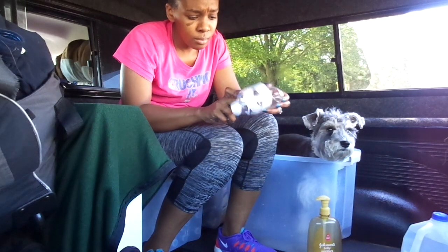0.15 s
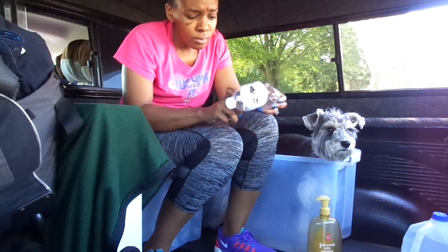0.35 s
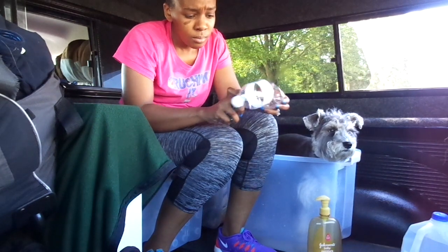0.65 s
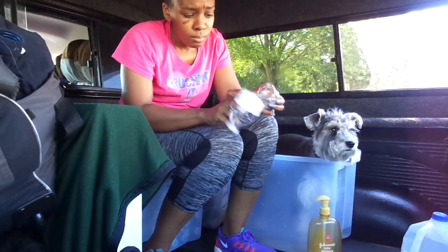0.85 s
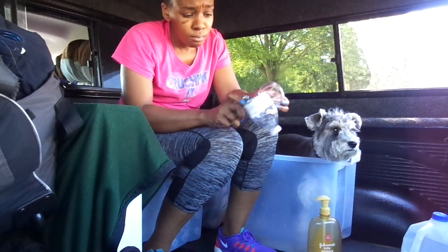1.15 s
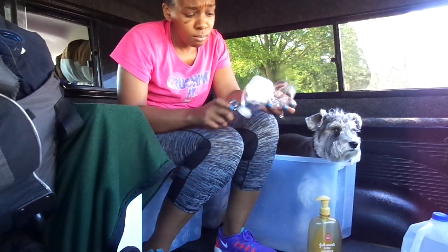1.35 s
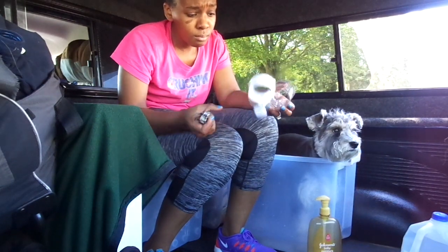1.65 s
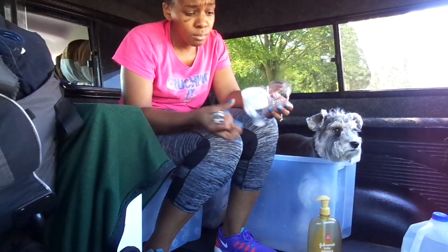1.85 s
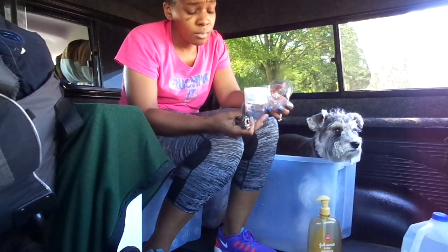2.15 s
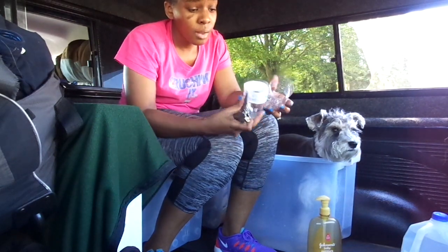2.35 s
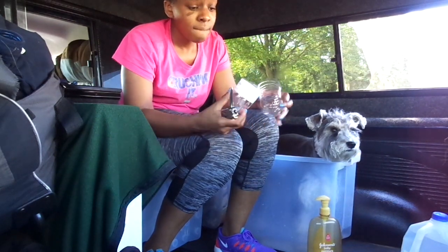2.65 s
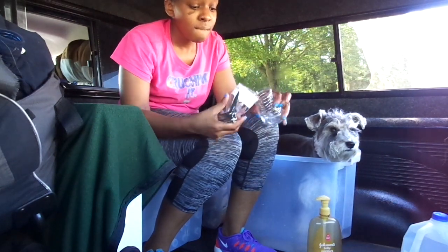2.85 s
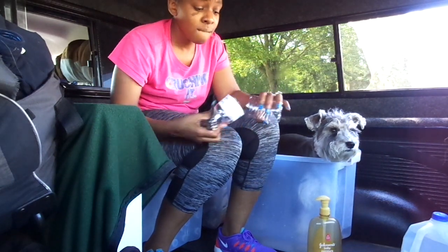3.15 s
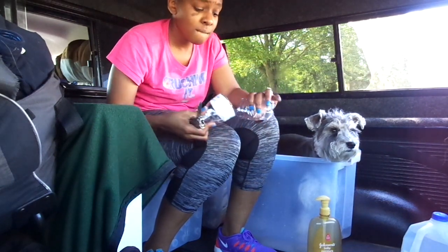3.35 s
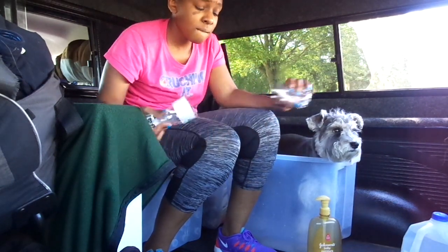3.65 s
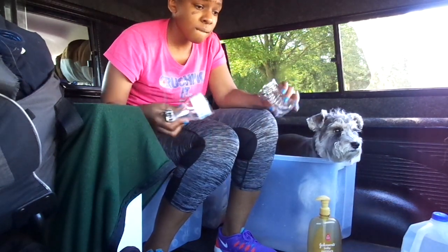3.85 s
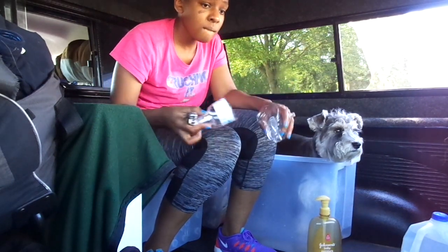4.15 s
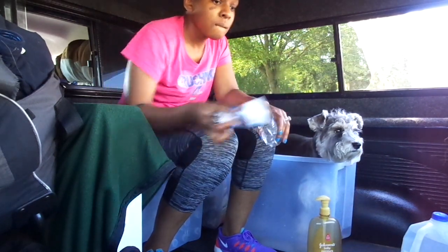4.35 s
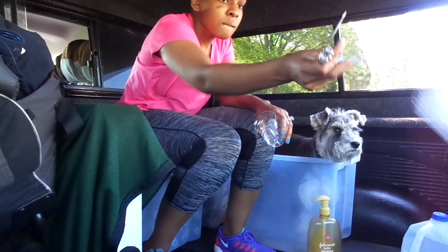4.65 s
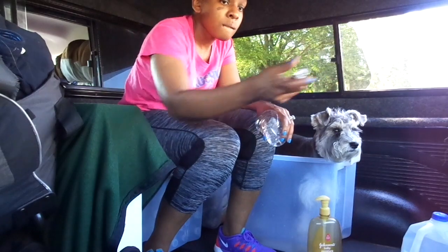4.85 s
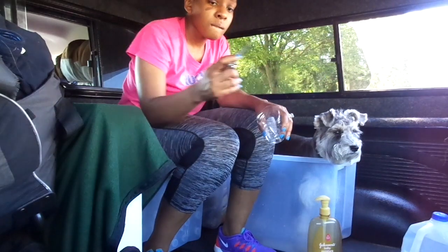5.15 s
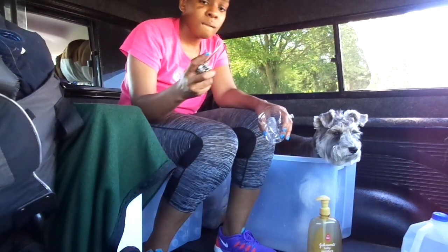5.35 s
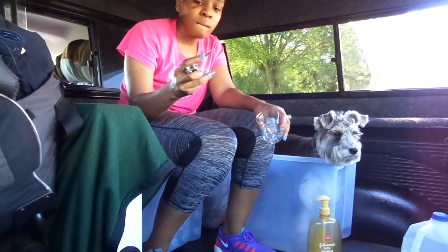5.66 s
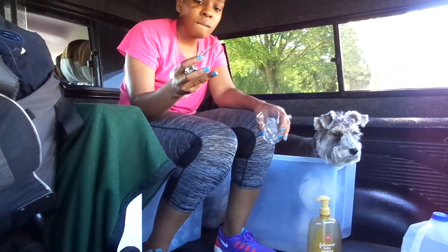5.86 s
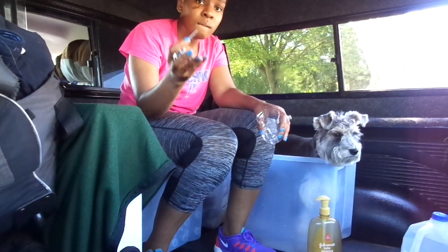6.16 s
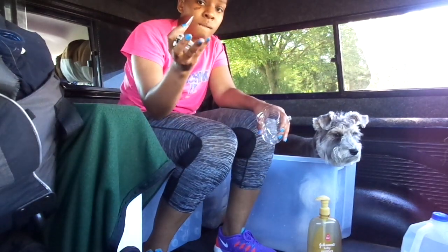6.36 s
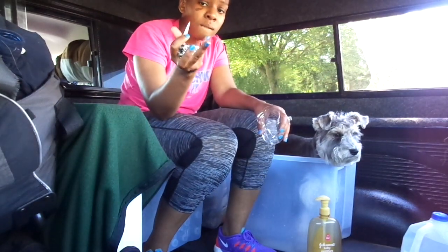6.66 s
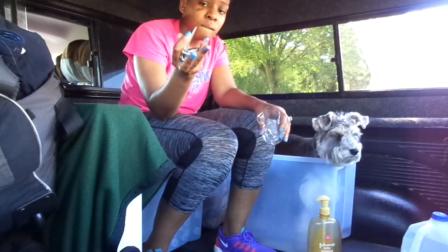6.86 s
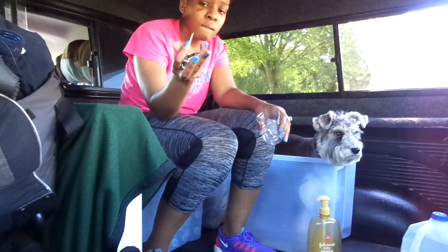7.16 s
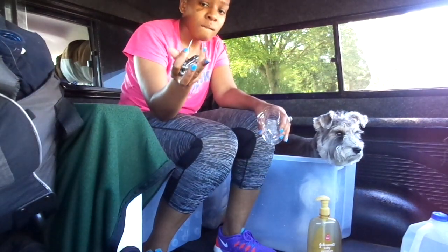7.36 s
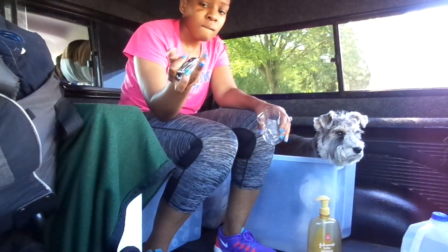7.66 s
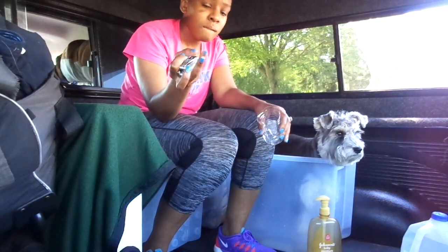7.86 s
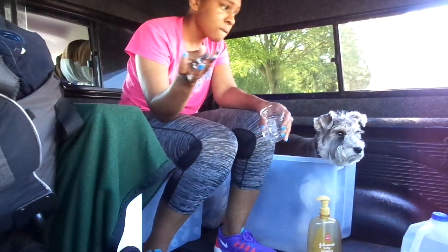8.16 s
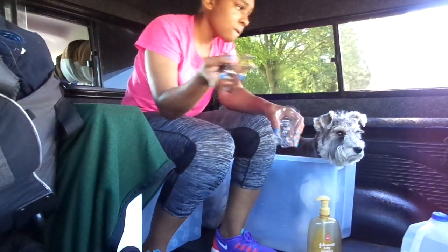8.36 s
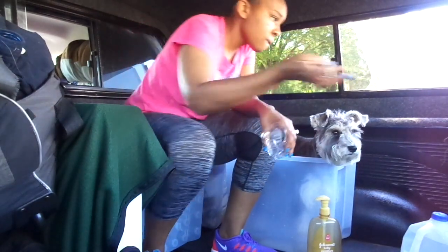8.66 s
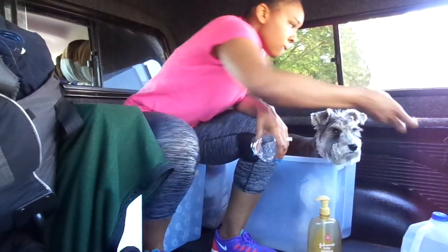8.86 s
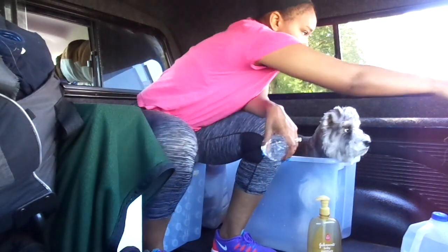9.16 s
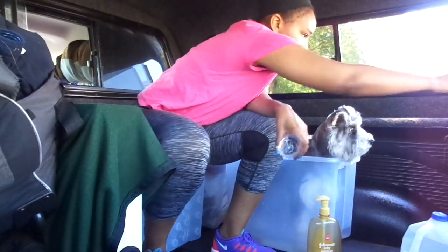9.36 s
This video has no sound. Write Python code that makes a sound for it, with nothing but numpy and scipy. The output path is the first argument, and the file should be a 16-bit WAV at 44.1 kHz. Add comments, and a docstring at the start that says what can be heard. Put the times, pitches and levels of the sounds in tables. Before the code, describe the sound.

A knife saws through a thin plastic bottle in a small padded vehicle, sharp crackling snaps, then a tossed piece bounces with hollow knocks.

```python
"""Inside a small padded van cabin a knife saws through a thin plastic bottle, a metre from a microphone.
Its strokes are dense random slips of plastic; the thin wall then snaps sharply, each snap a short run of
slips that rings a dimple and the cabin. A tossed piece lands and bounces in duller knocks, low decaying
tones sound with some loud blows and when a hand thumps a panel, and hands and cloth rub softly.
Traffic and hiss, made of shaped noise, hum under it all. The loudest blows overload the microphone."""
import sys
import numpy as np
from scipy import signal
from scipy.fft import rfft, irfft
from scipy.io import wavfile
from scipy.ndimage import uniform_filter1d

SR = 44100
rng = np.random.default_rng(int(sys.argv[2]) if len(sys.argv) > 2 else 0)


def to_wav(s):
    """Save 16-bit WAV."""
    ch = np.atleast_2d(s).T  # columns
    pcm = np.round(np.clip(ch, -1, 1) * 32767)  # PCM
    wavfile.write(sys.argv[1], SR, pcm.astype(np.int16))


N = 418950  # length in samples
SIZE = 16384  # samples in one filter or one blow

# fixed resonances of the cabin and microphone: [f/Hz, width/Hz, boost/dB]
RESONANCES = [(545, 76, 7.5), (684.7, 33, 13.5), (803, 36.5, 12.5), (943, 12, -19), (1001, 47, 11),
              (1106, 22, 5.5), (1327, 37, 2.5), (1581, 26, 6.5), (1860, 13, 1.5), (2150, 11.1, 4.5),
              (2320, 14, 1.5), (2660, 85, 1.5), (4380, 78, 5.5), (5400, 100, -5)]


def gain_of(db):
    """Turn decibels into a plain multiplier."""
    return 10 ** (np.asarray(db) / 20)


def evened(x):
    """Scale a signal to an average (rms) level of 1."""
    return x / np.sqrt(np.mean(x ** 2) + 1e-20)


def read(points, hz):
    """Read a curve of (frequency, value) points, joined by straight lines over log frequency."""
    f, value = np.transpose(points)
    return np.interp(np.log(hz + 1), np.log(f + 1), value)


def causal(db):
    """Spectrum with this gain whose ringing all follows the blow (minimum phase)."""
    cepstrum = irfft(np.maximum(db, -100) * np.log(10) / 20)
    # fold the half that lies before time zero onto the half after it
    cepstrum[1:SIZE // 2] *= 2
    cepstrum[SIZE // 2 + 1:] = 0
    return np.exp(rfft(cepstrum))


def peaks_db(modes, hz):
    """Gain in dB of resonances standing on a flat base."""
    return sum(db / (1 + (2 * (hz - f) / width) ** 2) for f, width, db in modes)


def snapping():
    """Sharp snaps of the thin wall as it buckles, and near 6.72 s probably the knife closing or opening."""
    # snaps: [t/s, nominal peak level/dB, dimple f/Hz, slipping time/s, mid level/dB, treble level/dB]
    # the mid and treble levels are against the peak
    snap_rows = [(.105, -22, 673, 0.0029, -1, -7), (.139, -13, 805, 0.0034, 2, -2),
                 (.262, -23.5, 646, 0.0051, 4, 1), (.413, -19, 651, .003, -4, -26),
                 (.712, -5, 864, 0.0031, -4, -12.5), (.736, -6, 2250, 0.0054, -9.5, -7),
                 (.791, -16, 810, 0.0028, -10, -10), (.869, -9.5, 990, 0.0032, -36, -15),
                 (.894, -17, 1090, .0033, 1, -6), (.949, -16.5, 980, 0.0039, -14, -11),
                 (.981, -16.5, 930, 0.0033, -24, -18), (1.033, -8.5, 930, 0.01, -12, -2.5),
                 (1.085, -8, 520, 0.0029, -27.5, -16), (1.095, -4, 880, 0.011, -32, -12),
                 (1.104, -7.5, 844, .001, 6, -18), (1.142, -7, 1010, 0.0031, -11.5, -9),
                 (1.247, -40, 895, 0.0029, -10, -1), (1.322, -28, 1020, 0.0068, -10, -14),
                 (1.365, -8, 2400, 0.0042, -14, -1.5), (1.422, -14.5, 662, 0.0045, -19, -22),
                 (1.506, -24.5, 653, 0.0042, -16, -18), (1.549, -27.5, 930, 0.021, -13, -12),
                 (1.577, -6.5, 734, 0.0018, -20.5, -31.5), (1.59, -16.5, 746, 0.002, -40, -32),
                 (1.807, -20.5, 1100, 0.0011, -22.5, -28), (2.142, -28.5, 991, 0.0094, -8, -6.5),
                 (2.411, -32.5, 2750, .0018, 2, -6), (2.502, -31, 970, 0.0022, -2, -25),
                 (2.576, -11.5, 1190, 0.00096, -17.5, -32), (2.621, -16, 1820, 0.0048, -11, -10.5),
                 (2.648, -1, 750, 0.0025, -1, 4), (2.73, -24, 845, 0.0063, -9, -12),
                 (2.754, -25.5, 1120, 0.0036, -10, -10), (2.909, -11.5, 2590, 0.0037, -15.5, -15),
                 (2.949, -20.5, 573, 0.0089, -20, -32), (3.03, -13.5, 714, 0.0084, -44, -35),
                 (3.092, -1.5, 888, 0.0017, -10.5, -9), (3.192, -9.5, 1020, 0.0048, -17.5, -16),
                 (3.215, 2.5, 1126, 0.0049, -13.5, -9), (3.273, -14.5, 800, .0073, -9.5, -9),
                 (3.297, 4, 794, 0.0065, -17, -7.5), (3.324, -4, 678, 0.0044, -3, -11),
                 (3.34, 2, 1960, 0.00087, -13.5, -9), (3.402, -1.5, 524, 0.0057, -13.5, -17),
                 (3.44, -2.5, 2430, 0.0027, -15, -11.5), (3.459, -1, 1140, 0.0043, -1.5, -4),
                 (3.483, 0, 840, .0018, -7.5, -5.5), (3.508, 5.5, 1095, 0.011, -15, -11.5),
                 (3.554, -14.5, 845, 0.0024, -12, -10), (3.714, -7, 1080, 0.0035, -17, -21),
                 (3.917, -7.5, 1160, 0.027, -17, -16), (3.933, 3, 760, 0.0032, -7, -8.5),
                 (4.144, -25.5, 780, 0.0035, -36, -35), (4.232, -21, 920, 0.0019, -11, -53),
                 (4.317, -24.5, 895, 0.0048, -24, -44), (4.409, -21, 790, 0.0037, -28, -28),
                 (4.445, -30, 1020, .0048, -14, -16), (4.484, -28.5, 870, 0.0031, -15, -32),
                 (4.944, -2, 1380, 0.014, -15.5, -11.5), (6.719, -1.5, 626, 0.0013, -23, -20),
                 (6.722, -3.5, 2380, 0.00091, -13.5, -11)]
    return blows(snap_rows, bass_db=-27.5, dimple_db=12.5)


def knocking():
    """Plastic knocks on something hard: the same slips and ringing as a snap, with more bass."""
    # knocks: [t/s, nominal peak level/dB, dimple f/Hz, slipping time/s, mid level/dB, treble level/dB]
    # the mid and treble levels are against the peak
    knock_rows = [(4.951, 2.5, 930, 0.0025, -11, -3), (4.967, 3.5, 1180, 0.00099, -17.5, -50),
                  (4.977, 0.5, 624, 0.0029, -17, -37), (5.038, -8.5, 940, 0.016, -13.5, -10.5),
                  (5.104, -10, 775, 0.0033, -28, -18), (5.111, -10.5, 1090, .0024, -3.5, 2),
                  (5.178, -21, 890, 0.0027, -21, -25), (5.306, 9, 1100, 0.0019, -28, -40),
                  (5.315, 0.5, 735, 0.0016, -44, -54), (5.359, -3, 1030, .0022, -22, -34),
                  (5.37, -.5, 800, 0.0039, -26, -39), (5.381, -11, 813, 0.0044, -38, -47),
                  (5.399, -10.5, 1010, 0.0035, -32, -33), (5.417, -11, 790, 0.005, -41, -42),
                  (5.444, -4, 760, 0.0022, -42, -43), (5.471, -10.5, 920, .0041, -29, -35),
                  (5.502, -11.5, 694, .0048, -57, -26), (5.524, -8, 670, 0.014, -30.5, -46),
                  (5.57, -13.5, 720, 0.0015, -55, -48), (8.705, -27, 452, 0.0024, -15.5, -26),
                  (8.712, -24.5, 513, 0.0053, -31, -34), (8.774, -28.5, 546, .0024, -20, -26),
                  (9.059, -29, 681, 0.003, -35.5, -28), (9.348, -36, 1900, .0039, -15, -30),
                  (9.365, -23.5, 401, 0.0029, -26, -24)]
    return blows(knock_rows, bass_db=-18, dimple_db=10.5)


def blows(rows, bass_db, dimple_db):
    """A short run of slips rings one dimple and the cabin; echoes build up while it lasts."""
    # usual colour of a blow: [f/Hz, level per Hz/dB]
    usual_colour = [(88, -69), (150, -31), (308, -12), (751, -1.5), (1170, -1.5), (1510, -7.5),
                    (2310, -1.5), (2860, -10), (4930, -14.5), (8330, -23), (11400, -22.5), (13800, -25.5),
                    (15500, -42.5)]
    usual_bass_db, usual_mid_db, usual_treble_db = -24.5, -12.5, -18.5  # against the peak, for that colour
    bass_db_per_octave, usual_dimple_hz = -6.5, 764  # a larger, lower dimple pushes more bass
    sizzle_per_treble, sizzle_db = 1, 4  # the top octave follows the treble, a little lower
    direct_db, echo_db = -3.5, -0.2
    crest_db = 13.5  # nominal peak of a blow over the rms of its first 30 ms

    hz = np.fft.rfftfreq(SIZE, 1 / SR)
    t = np.arange(SIZE // 2) / SR
    out = np.zeros(N + SIZE)
    usual = read(usual_colour, hz)
    ringing = causal(peaks_db(RESONANCES, hz))
    blurred = causal(0.29 * peaks_db(RESONANCES, hz))  # echoes come from all sides, where the cabin's modes mix

    for s, db, dimple_hz, slip_s, mid_db, treble_db in rows:
        slip_s = max(slip_s, 3e-4)
        envelope = np.exp(-t / slip_s) * (1 - np.exp(-t / 0.00028))
        run = slips(len(t), per_s=3000, spread_db=5.0) * envelope
        run /= np.sqrt(np.sum(run ** 2) + 0.00087)
        direct = gain_of(direct_db) * rfft(run, SIZE) * ringing
        tail = cabin(count=1, rise_s=0.5 * slip_s)[0]
        echoes = gain_of(echo_db) * rfft(tail, SIZE) * blurred

        # tilt the usual colour towards this blow's own bass, mid and treble
        octaves = np.log2(dimple_hz / usual_dimple_hz)
        low_db = bass_db - usual_bass_db + bass_db_per_octave * octaves
        bright_db = treble_db - usual_treble_db
        lean = read([(350, low_db), (600, 0.0063), (1300, 0.022), (2300, mid_db - usual_mid_db),
                     (5000, bright_db), (11000, sizzle_per_treble * bright_db - sizzle_db)], hz)
        dimple = peaks_db([(dimple_hz, 250, dimple_db)], hz)
        sound = irfft((direct + echoes) * causal(usual + lean + dimple))
        head = sound[:round(0.03 * SR)]
        out[round(s * SR):][:SIZE] += gain_of(db - crest_db) * sound / np.sqrt(np.mean(head ** 2))
    return out[:N]


def sawing():
    """The blade catches and tears the plastic in dense slips; each stroke has its own brightness."""
    # knife strokes: [start t/s, held for/s, level/dB, treble over the usual colour/dB]
    strokes = [(-.02, 0.03, -20.5, 4), (.03, 0.058, -33, 8), (.14, 0.074, -21, 4.5), (.262, .03, -35, 12),
               (.288, 0.063, -18, 4), (.42, 0.076, -17.5, 4), (.565, .02, -39, 2), (.583, 0.037, -17, 4),
               (.698, .012, -38, 3), (.71, 0.036, -18.5, 2), (.836, 0.036, -23, -4),
               (.855, .09, -34.5, 9.5), (.95, .12, -29, 5.5), (1.083, 0.031, -24, 11),
               (1.14, 0.039, -32.5, 11)]
    # colour of a stroke: [f/Hz, level per Hz/dB]
    sawn_colour = [(88, -43), (150, -32.5), (352, -17.5), (509, -1.5), (668, 2), (877, -3.5), (985, 4),
                   (1700, -9), (2270, -8), (2920, -19), (6350, -28), (12300, -41), (15500, -44)]
    hz = np.fft.rfftfreq(SIZE, 1 / SR)
    # the blade bites, holds, and lets go
    level, treble_db = swells(strokes, rise_s=0.0053, fall_db_per_s=900)
    drive = level * evened(slips(N, per_s=2800, spread_db=2.5))
    colour = read(sawn_colour, hz) + 0.5 * peaks_db(RESONANCES, hz)
    high = 1 / (1 + (3000 / (hz + 1)) ** 4)  # share of the power that goes to the treble, half at 3 kHz
    dull = through(drive, colour + 10 * np.log10(1.001 - high))
    bright = through(drive * gain_of(treble_db), colour + 10 * np.log10(high + 1e-9))
    return dull + gain_of(-10) * bright


def low_tones():
    """Low decaying tones: two are bass from microphone overload at loud blows, two a thump on a panel."""
    # tones: [t/s, level/dB, f/Hz, time to fall by 60 dB/s, rise time/s]
    tones = [(3.508, -8.5, 70, 0.021, .002), (4.95, -19.5, 80, 0.035, 0.0022),
             (9.351, -17.5, 122, 0.065, 0.0052), (9.368, -9.5, 127, .09, 0.002)]
    t = np.arange(SIZE) / SR
    out = np.zeros(N + SIZE)
    for s, db, hz, t60, rise_s in tones:
        envelope = gain_of(db - 60 * t / t60) * (1 - np.exp(-t / rise_s))
        out[round(s * SR):][:SIZE] += envelope * np.sin(2 * np.pi * hz * t)
    return out[:N]


def rubbing():
    """Hands and cloth rub softly on the bottle and seat in many small random slips."""
    # rustles: [start t/s, held for/s, level/dB]
    rustles = [(1.2, 0.29, -45), (1.65, 0.32, -51.5), (2.3, .12, -50), (2.7, 0.15, -43), (4.15, .35, -47.5),
               (4.6, 0.15, -45.5), (5.14, .14, -45), (5.38, 0.18, -41.5), (8.18, 0.18, -53.5),
               (8.6, 0.11, -46.5), (8.68, 0.11, -47), (8.86, 0.13, -48.5), (8.98, 0.048, -45),
               (9.29, .04, -51)]
    # colour of a rustle: [f/Hz, level per Hz/dB]
    rubbed_colour = [(59, -38), (100, -15), (241, -20.5), (477, -11), (698, -5), (2470, -23), (3200, -28),
                     (12000, -45), (15600, -69.5), (22000, -120)]
    hz = np.fft.rfftfreq(SIZE, 1 / SR)
    level, _ = swells(rustles, rise_s=0.038, fall_db_per_s=154)
    drive = level * evened(slips(N, per_s=1500, spread_db=1.5))
    return through(drive, read(rubbed_colour, hz))


def creaking():
    """The wall strains before it gives: evenly timed stick-slips of uneven size make one thin creak."""
    # creak: [start t/s, held for/s, level/dB]
    creak_rows = [(4.875, 0.057, -40)]
    slips_per_s = 424
    hz = np.fft.rfftfreq(SIZE, 1 / SR)
    ticks = np.diff(np.floor(np.arange(N + 1) * slips_per_s / SR))
    strain = evened(ticks * gain_of(1.5 * rng.standard_normal(N)))
    level, _ = swells(creak_rows, rise_s=0.0043, fall_db_per_s=2497)
    return through(level * strain, peaks_db([(3200, 2500, 45)], hz), direct_db=3)


def hum():
    """Traffic and microphone hiss: random short spectra with faint patches and a slow swell."""
    # colour of the hum and hiss: [f/Hz, level per Hz/dB]
    hum_colour = [(18, -47), (30, -1), (66, 4), (132, 11), (229, 1), (254, 3), (438, 5), (486, 4.5),
                  (539, 9), (614, 6.5), (885, 12), (1120, 3), (1270, 1.5), (3090, -13.5), (15100, -20.5)]
    hum_db, patchy_db, swell_db = -45.5, 0.9, 0.9
    frames = N // 256 + 5
    hz = np.fft.rfftfreq(1024, 1 / SR)
    a, b, patches = rng.standard_normal((frames, 513, 3)).T
    patches = uniform_filter1d(patches, 12, 0)  # smooth over frequency
    patches = evened(uniform_filter1d(patches, 14, 1))  # smooth over time
    t = np.arange(frames) * 256 / SR
    # slow waves from 0.2 to 5 Hz, the slower ones larger
    swell = evened(sum(np.sin(2 * np.pi * (f * t + rng.random())) / np.sqrt(f)
                       for f in np.geomspace(0.2, 5, 20)))
    level_db = read(hum_colour, hz)[:, None] + patchy_db * patches
    level_db = level_db + swell_db * swell / (1 + hz[:, None] / 3000)  # the treble swells less
    noise = signal.istft((a + 1j * b) * gain_of(level_db), nperseg=1024, noverlap=768)[1][:N]
    return gain_of(hum_db) * evened(noise)


def slips(count, per_s, spread_db):
    """Sudden slips of plastic at random moments, a few of them large, pushing either way."""
    size = gain_of(spread_db * np.minimum(rng.exponential(1, count), 4))
    return size * rng.choice([-1., 1.], count) * (rng.random(count) < per_s / SR)


def swells(rows, rise_s, fall_db_per_s):
    """Level of events that rise, hold and die away, and the last column of whichever is loudest."""
    start, held, db, *more = np.transpose(rows)[:, :, None]
    t = np.arange(N) / SR - start
    level = np.clip(t / rise_s, 0, 1) * gain_of(db - fall_db_per_s * np.maximum(t - held, 0))
    return level.max(axis=0), np.transpose(rows)[-1][level.argmax(axis=0)]


def through(drive, db, direct_db=-2):
    """A lasting drive heard through a colour, directly and with echoes from three places in turn."""
    turn = 2 * np.pi * np.arange(N) / SR / 0.11  # one full turn every 0.11 s
    paths = cabin(count=3, rise_s=0.00085)
    paths[:, 0] = gain_of(direct_db)  # the direct sound, ahead of the echoes
    places = irfft(causal(db) * rfft(paths, SIZE))
    places /= np.linalg.norm(places, axis=1, keepdims=True)
    out = np.zeros(N)
    for k in range(3):
        share = np.cos(turn + k * np.pi / 3) * np.sqrt(2 / 3)  # the three powers add up to 1
        out += signal.oaconvolve(drive * share, places[k])[:N]
    return out


def cabin(count, rise_s):
    """Dense echoes from several places, building up and then dying band by band."""
    # echo decay of the cabin: [f/Hz, time to fall by 60 dB/s]
    decay = [(250, 0.2), (660, .12), (1740, 0.1), (4590, .11), (12100, 0.095)]
    hz, t, z = signal.stft(rng.standard_normal((count, SIZE // 2)), SR, nperseg=128)
    fading = z * gain_of(-60 * t / read(decay, hz)[:, None])
    tail = signal.istft(fading, SR, nperseg=128)[1][:, :SIZE // 2]
    tail *= 1 - np.exp(-np.arange(SIZE // 2) / SR / rise_s)
    return tail / np.linalg.norm(tail, axis=1, keepdims=True)


def scene():
    """Add up every source; one microphone feeds both channels."""
    mono = snapping() + knocking() + sawing() + low_tones() + rubbing() + creaking() + hum()
    return np.array([mono, mono])


def low_pass(x, hz):
    """Remove what lies above this frequency with a steep filter."""
    taps = signal.firwin(511, hz, window=("kaiser", 9), fs=SR)
    return signal.oaconvolve(x, taps[None], "same")


def record(dry):
    """Microphone band limit, overload at full scale, then the final cut-off."""
    mic_hz, edge_hz = 15150, 16075
    overloaded = np.clip(low_pass(dry, mic_hz), -1, 1)
    return low_pass(overloaded, edge_hz)


dry = scene()
out = record(dry)
to_wav(out)
```